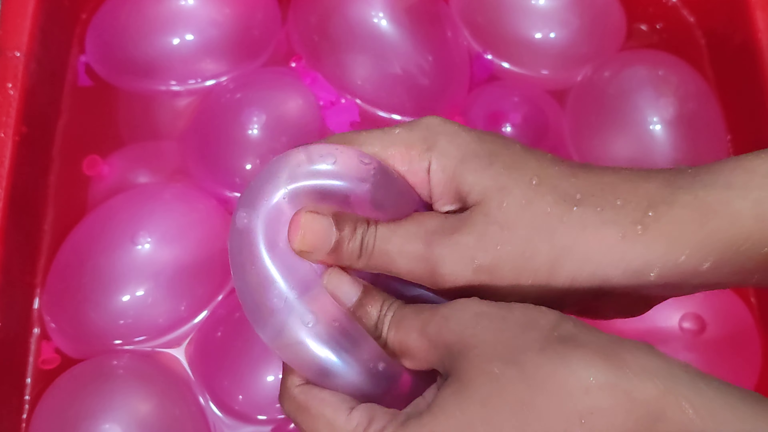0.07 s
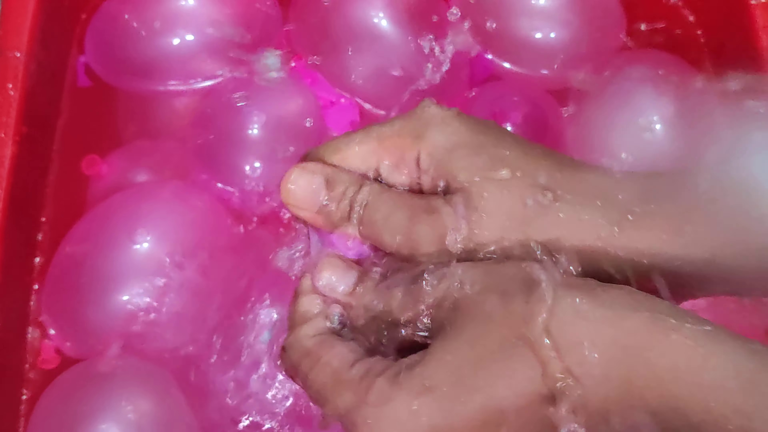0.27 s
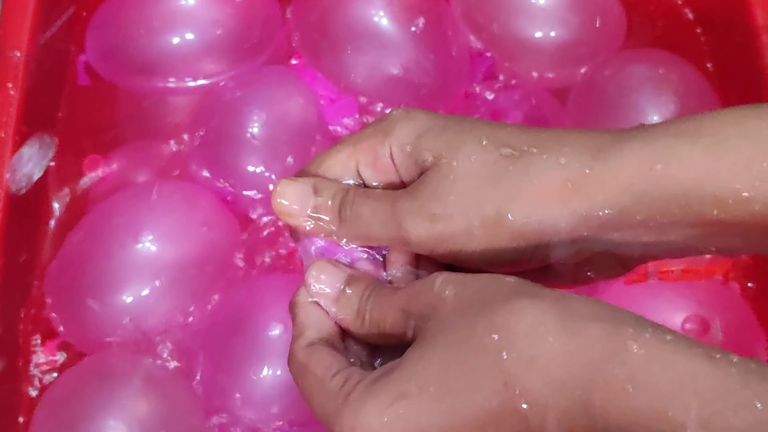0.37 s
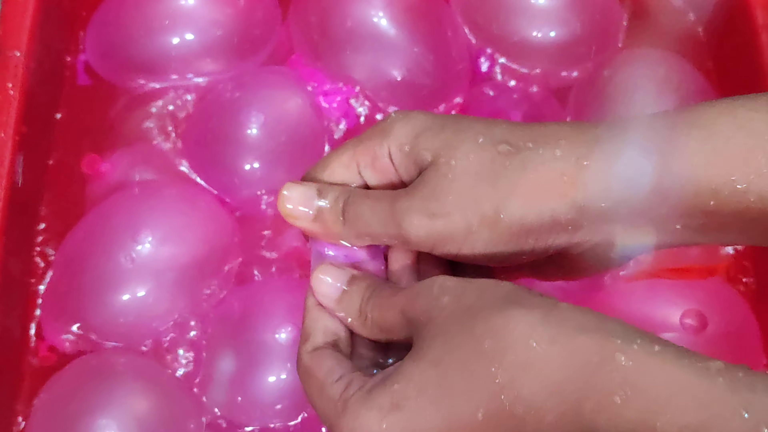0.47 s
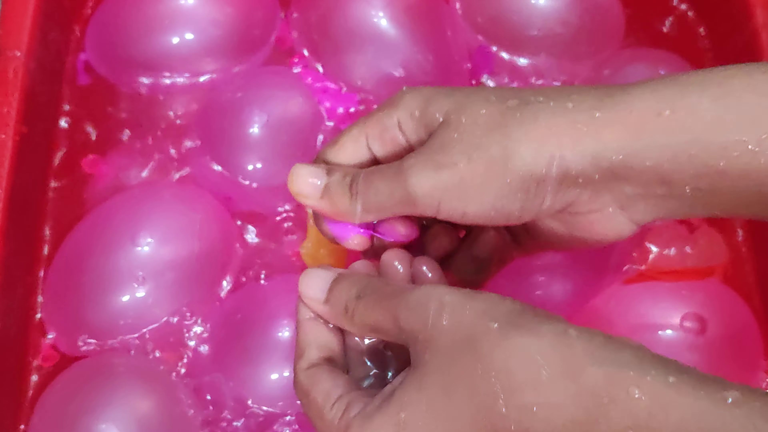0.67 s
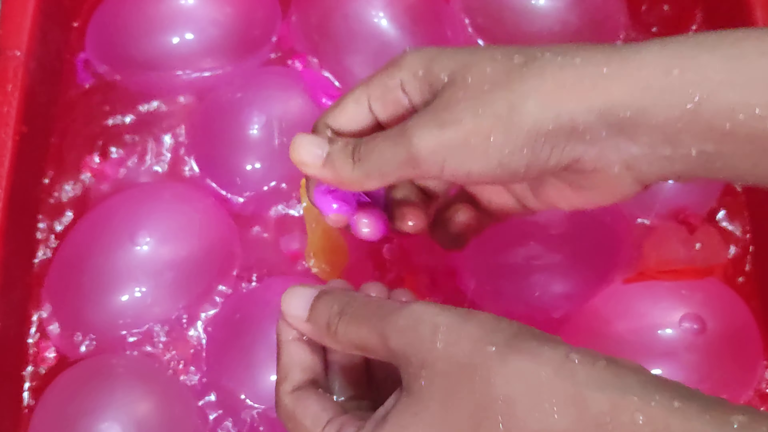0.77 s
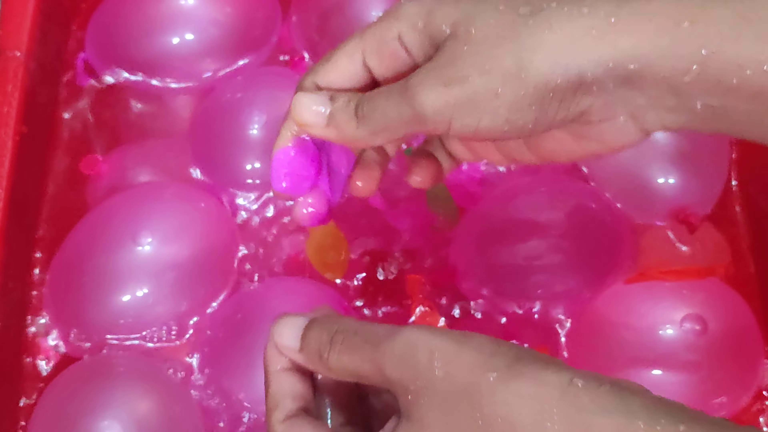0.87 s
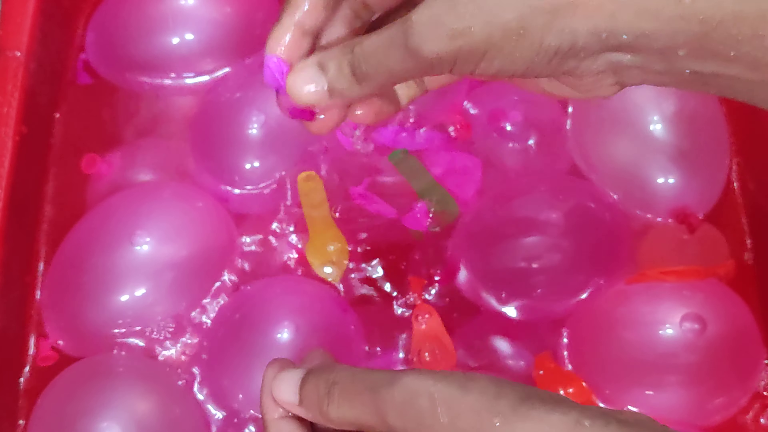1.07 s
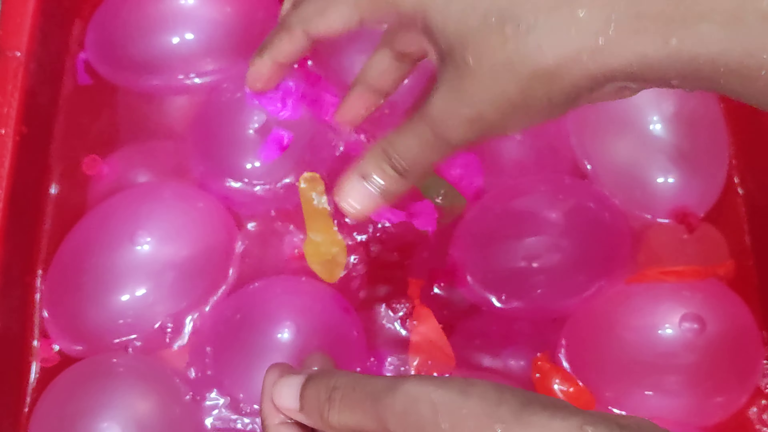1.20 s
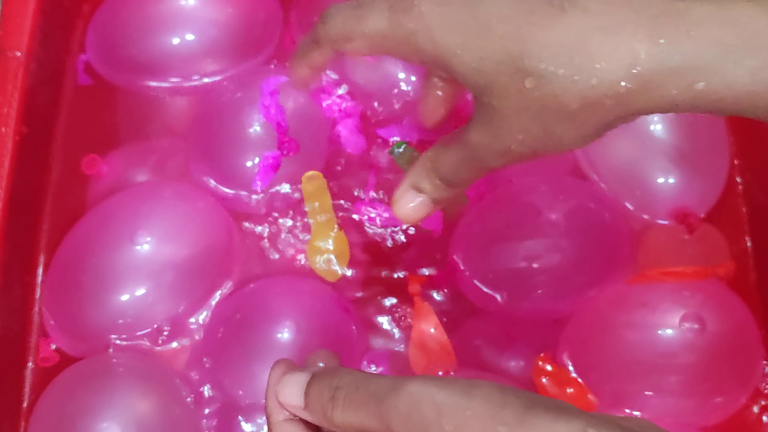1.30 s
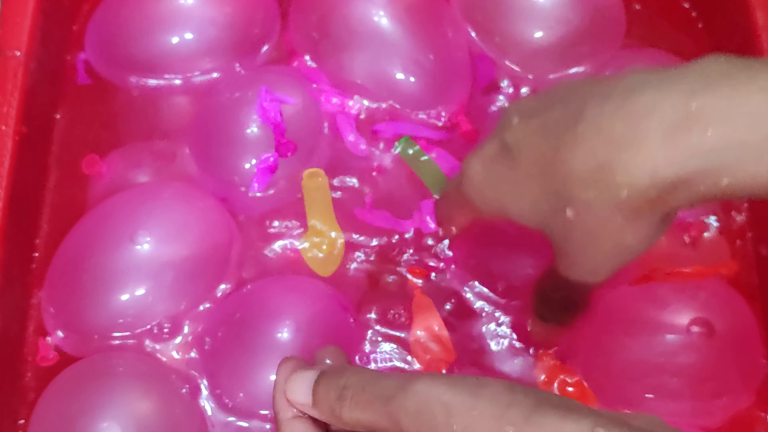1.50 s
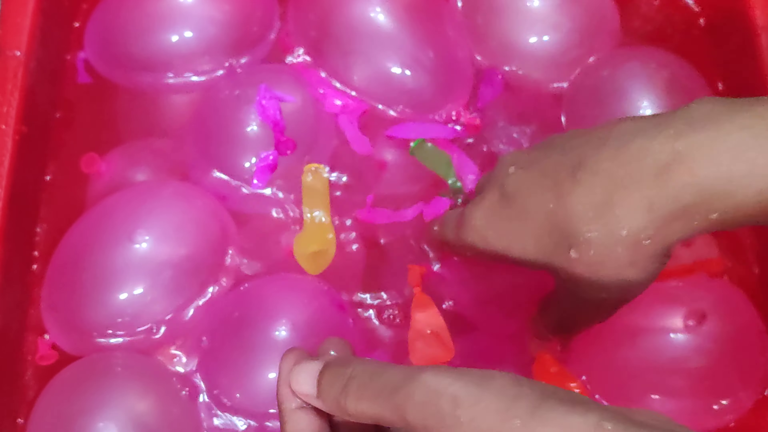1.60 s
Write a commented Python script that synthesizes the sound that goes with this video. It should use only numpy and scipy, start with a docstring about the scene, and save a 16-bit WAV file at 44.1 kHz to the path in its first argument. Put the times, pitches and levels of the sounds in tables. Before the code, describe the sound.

A water balloon bursts with a sharp loud pop, then water splashes down and drips away

```python
"""Water balloon bursting over a tub

A water balloon bursts over a plastic tub of water in a small hard room, close to the microphone.
The rubber snaps as cracks of noise with a sine knock, a hiss of mist follows, and puffs thump the microphone.
Bubbles ring as sines that rise in pitch, and drops splat as bursts of coloured noise.
Falling water is a hail of tiny ringing grains; decaying noise tails make the room, over air and a low rumble."""
import sys
import numpy as np
from scipy import signal
from scipy.fft import rfft, irfft
from scipy.io import wavfile

SR = 44100
rng = np.random.default_rng(int(sys.argv[2]) if len(sys.argv) > 2 else 0)


def generate_wav(sig):
    """Save sig (samples, or channels by samples) to the path in sys.argv[1] as 16-bit PCM at SR."""
    pcm = np.round(np.clip(np.atleast_2d(sig).T, -1, 1) * 32767).astype(np.int16)
    wavfile.write(sys.argv[1], SR, pcm)


N = 72765
T = np.arange(N) / SR  # seconds
HZ = np.fft.rfftfreq(N, 1 / SR)


def amp(db):
    """Decibels to gain."""
    return 10 ** (np.asarray(db) / 20)


def unit(x):
    """Scales to rms 1."""
    return x / np.sqrt(np.mean(x ** 2) + 1e-20)


def read(points, hz):
    """Reads a frequency table on a log-frequency axis."""
    f, value = np.transpose(points)
    return np.interp(np.log(hz + 1), np.log(f + 1), value)


def hump(hz, octaves):
    """A bell-shaped spectrum in dB, 4.3 dB down at the given octaves from its centre."""
    distance = np.log2((HZ + 1) / hz) / octaves
    return np.maximum(-10 * np.log10(np.e) * distance ** 2, -70)


def colour(x, db):
    """Minimum-phase filter with the given spectrum; keeps the power of white noise."""
    log_gain = np.log(unit(amp(db)))
    both_sides = np.r_[log_gain, log_gain[1:N - len(HZ) + 1][::-1]]
    # the Hilbert transform of the log gain gives the phase that makes the filter causal
    response = np.exp(np.conj(signal.hilbert(both_sides)))
    taps = np.fft.ifft(response).real[:4096]
    return signal.fftconvolve(x, taps[None], axes=1)[:, :N]


def pan(db):
    """Left and right gains for a left-over-right level difference."""
    return amp(np.array([[db], [-db]]) / 2)


def swell(age, rise_s, decay_s):
    """An envelope that rises and dies away exponentially."""
    return (1 - np.exp(-age / rise_s)) * np.exp(-age / decay_s)


def burst(s, decay_s, rise_s):
    """A puff of noise that swells and dies away, partly alike in both channels."""
    noise = rng.standard_normal((3, N))
    age = np.maximum(T - s, 0)
    return unit(noise[:2] + 0.4 * noise[2]) * swell(age, rise_s, decay_s)


def room(x, wet_db):
    """The dense ring of hard walls as a noise tail, each band dying at its own speed."""
    # Decay of the room. Each row: frequency in Hz, time to fall by 60 dB in seconds.
    decay_times = [(100, 0.6), (300, 0.16), (900, 0.3), (2000, 0.31), (5500, 0.31), (10000, 0.23),
                   (15000, 0.28)]
    gap_s, build_s = 0.00067, 0.002
    t = T[:SR * 3 // 4]
    density = np.minimum(.08 + t / .08, 1)  # sparse echoes fill in to a dense tail
    echoes = rng.standard_normal((2, len(t))) * (rng.random((2, len(t))) < density)
    echoes *= np.clip((t - gap_s) / build_s, 0, 1)
    hz, at, bands = signal.stft(echoes, SR, nperseg=256)
    fade = amp(-60 * at / read(decay_times, hz)[:, None])
    tail = signal.istft(bands * fade, SR, nperseg=256)[1]
    tail /= np.linalg.norm(tail, axis=1, keepdims=True)
    return amp(wet_db) * signal.fftconvolve(x, tail, axes=1)[:, :N]


def pop():
    """The rubber rips in a few quick cracks, the skin collapses with a knock and the room answers the cracks."""
    # The rubber rips and whips back. Each row: start in seconds, level in dB relative to pop_db.
    rips = [(.2189, -0.5), (.2197, 0), (0.2215, -0.5), (0.2271, -6.5), (0.2332, -7.5), (0.236, -23)]
    # Tone of the cracks. Each row: frequency in Hz, relative level in dB.
    snap_spectrum = [(100, -6), (400, -6.5), (600, -3.5), (1000, 1.5), (1700, 2.5), (2200, 0), (4300, 0),
                     (5500, 0), (7500, 0.5), (9000, -0.5), (10800, 0.5), (12000, 7.5), (15500, 3.5)]
    # Hollow knock of the collapsing skin. Each row: pitch in Hz, level in dB before panning, decay in seconds.
    knock_modes = [(270, -37, 0.0017), (387, -20.5, 0.0018), (744, -27.5, 0.0027), (1110, -26, 0.002),
                   (1570, -27.5, .003), (2200, -19.5, 0.001)]
    pop_db, crack_decay_s, crack_rise_s = -10.5, 0.00078, 0.00005
    knock_s = .2193
    bursts = sum(amp(pop_db + db) * burst(s, crack_decay_s, crack_rise_s) for s, db in rips)
    cracks = colour(bursts, read(snap_spectrum, HZ))
    age = np.maximum(T - knock_s, 0)
    knock = sum(amp(db) * np.exp(-age / decay) * np.sin(2 * np.pi * hz * age)
                for hz, db, decay in knock_modes)
    return (cracks + room(cracks, wet_db=0)) * pan(db=3) + knock * pan(db=8)


def spray():
    """The skin of the water tears into a short hiss of mist."""
    # Tone of the mist. Each row: frequency in Hz, relative level in dB.
    mist_spectrum = [(300, -28.5), (1700, -3.5), (4500, -17), (7400, -8), (9000, -16), (10500, -14),
                     (12000, 0), (15500, -2)]
    hiss = colour(burst(s=.222, decay_s=0.019, rise_s=.004), read(mist_spectrum, HZ))
    return amp(-16.5) * hiss * pan(db=-1.5)


def puffs():
    """Steps of pressure from air and water shove the microphone ports, heard as thumps."""
    # Shoves. Each row: start in seconds, left and right pressure (full scale is 1, before the envelope
    # and leak), rise in seconds, release in seconds.
    shoves = [(0.2209, 0.18, -0.012, 0.000045, 0.038), (0.2194, -0.9, -0.16, 0.0017, 0.026),
              (0.3263, 0.22, 0.0073, 0.0017, 0.28), (.349, 0.089, 0.095, 0.0022, 0.13)]
    leak_hz = 2.17  # the pressure leaks away below this
    steps = np.zeros((2, N))
    for s, left, right, rise, release in shoves:
        age = np.maximum(T - s, 0)
        steps += np.array([[left], [right]]) * swell(age, rise, release)
    return signal.sosfilt(signal.butter(1, leak_hz, "high", fs=SR, output="sos"), steps)


def bubbles():
    """Each bubble rings briefly as a sine and rises in pitch as it nears the surface."""
    # Bubbles trapped in the tub. Each row: start in seconds, starting pitch in Hz, level in dB before
    # the envelope, decay in seconds, pitch rise per decay time as a fraction.
    trapped = [(0.3709, 1011, -25.5, 0.0056, 0.037), (.371, 1920, -23, 0.0025, 0.031),
               (0.371, 2560, -32, 0.0048, 0.073), (.392, 1050, -32, 0.011, .005),
               (.42, 1038, -31, 0.011, 0.0058), (.436, 3670, -31.5, 0.0019, 0.0069),
               (0.4804, 1420, -28, 0.0051, 0.019), (.484, 930, -42, 0.014, .001),
               (.49, 1055, -40, 0.0084, 0.0056), (.487, 2505, -34.5, 0.0029, .03),
               (0.491, 1760, -28.5, 0.0017, .04), (0.516, 1567, -34.5, 0.0042, 0.033),
               (.535, 1209, -40, 0.0052, 0.027), (.578, 1660, -40, 0.004, 0.041),
               (.77, 2100, -42.5, 0.0019, 0.025), (0.817, 5230, -28, 0.0016, 0.018),
               (0.833, 5100, -29, 0.0011, 0.038), (.85, 760, -53.5, 0.012, 0.012),
               (0.907, 4130, -27.5, 0.00097, 0.036), (.908, 710, -40, 0.003, .05),
               (.909, 1216, -45, 0.0029, .03), (.912, 485, -45.5, 0.0038, .04),
               (1.233, 3770, -34.5, 0.0014, 0.036), (1.24, 3100, -51.5, 0.0035, .01),
               (1.25, 3630, -40.5, 0.0018, 0.04), (1.267, 3800, -52, .0015, .02),
               (1.289, 3600, -55, .002, 0.018), (1.606, 2380, -53, 0.0015, 0.016)]
    rise_s, room_db = 0.00081, 0.5
    rings = []
    for s, hz, db, decay, pitch_rise in trapped:
        age = np.maximum(T - s, 0)
        pitch = hz * (1 + pitch_rise * np.minimum(age / decay, 10))
        turns = np.cumsum(pitch * (age > 0)) / SR
        rings.append(amp(db) * swell(age, rise_s, decay) * np.sin(2 * np.pi * turns))
    # three groups, each with its own room tail
    wet = sum(room(sum(rings[k::3]) * pan(0), room_db) for k in range(3))
    return sum(rings) + wet


def drops():
    """Single splats of noise, each with its own colour and its own share of the room."""
    # Drops and gobs of water landing. Each row: start in seconds, level in dB before envelope and panning,
    # centre in Hz, width in octaves, decay in seconds, left-over-right level in dB, room send in dB.
    landings = [(0.3255, -38.5, 3900, 2.46, 0.029, 15.5, 4), (0.358, -26, 490, 1.46, 0.0024, 9.5, -10.5),
                (0.37, -30.5, 3300, 1.56, 0.0095, -4.5, 2.5), (0.456, -36, 6510, 1.5, 0.0041, 2, 5),
                (0.481, -34, 2120, 1.43, 0.0054, -6, 2), (0.494, -31, 6160, 0.25, 0.0022, 4, -2.5),
                (0.564, -31, 5250, 0.36, 0.0036, -1.5, 2.5), (0.575, -38, 5900, 0.21, 0.0014, 3, 5.5),
                (.617, -30.5, 8100, 0.55, 0.0027, 0, 2), (0.7292, -29.5, 11000, 1.36, 0.0025, -3, 4),
                (0.739, -31.5, 9900, 1.36, 0.004, 1, 2), (0.763, -32, 9500, 1.06, 0.0045, 1, -3),
                (.8182, -29.5, 6470, 0.55, 0.0018, -2, 5), (0.849, -37, 10500, 0.28, 0.0027, 5, -6),
                (0.9054, -32.5, 3180, 2.1, 0.0027, 3.5, -4.5), (0.9208, -31.5, 9200, 1.9, .003, -7, -1),
                (.966, -53, 9000, 0.83, 0.0025, 5, -5), (0.9728, -38, 13200, 0.42, 0.0034, 2, -1),
                (1.0393, -34.5, 11100, .9, 0.0007, 1, -5), (1.1696, -49.5, 9160, 1.2, 0.0022, 1, 0),
                (1.2308, -38, 9500, 1.6, 0.0013, 0.5, 3), (1.309, -42.5, 13500, 0.35, 0.0034, -1, -3.5),
                (1.6045, -55.5, 1570, 0.53, 0.011, 2, 3)]
    rise_share = 0.21  # rise time as a share of the decay time
    splats, sends = [], []
    for s, db, hz, width, decay, side, room_db in landings:
        noise = burst(s, decay, rise_share * decay)
        splat = amp(db) * pan(side) * colour(noise, hump(hz, width))
        splats.append(splat)
        sends.append(amp(room_db) * splat)
    # three groups, each with its own room tail
    return sum(splats) + sum(room(sum(sends[k::3]), 0) for k in range(3))


def shower(spectrum, per_s, level_db, low_hz, high_hz, count=24):
    """A hail of ringing droplets, random in size and place; per_s counts those of all pitches together."""
    decay_cycles, pitch_rise = 2.8, 0.065  # the rise is a fraction per decay time
    size_db, spread = 3, 0.63  # the spread sets the random left and right parts
    out = np.zeros((2, N))
    for hz in np.geomspace(low_hz, high_hz, count):
        turns = hz * T[:1500]
        bend = 1 + pitch_rise * np.minimum(turns / decay_cycles, 2) / 2
        grain = np.exp(-turns / decay_cycles) * np.sin(2 * np.pi * turns * bend)
        size = amp(size_db * np.minimum(rng.exponential(1, N), 4))
        hits = size * (rng.random(N) < per_s / count / SR)
        shared_sign = rng.choice([-1, 1], N)
        train = hits * (shared_sign + spread * rng.uniform(-2.58, 3.2, (2, N)))
        out += signal.oaconvolve(train, np.sqrt(hz) * unit(grain)[None], axes=1)[:, :N]
    out = unit(colour(out, read(spectrum, HZ))) * amp(level_db) / 2
    return out + room(out, wet_db=2)


def falling_water():
    """The mass of water splashes down, then thins to a spatter."""
    # Fall of the water. Each row: time in seconds, level of the low splash in dB, level of the fine
    # spatter in dB, both before the halving in shower, the room and the panning.
    flow = [(.22, -86, -98), (.25, -55, -55), (0.309, -45.5, -42), (0.378, -33.5, -37), (0.449, -49.5, -48),
            (.53, -47, -51), (0.622, -50, -52), (0.701, -56.5, -46.5), (0.781, -55, -43.5),
            (.88, -54.5, -50.5), (0.939, -55.5, -40.5), (1.029, -69.5, -63.5), (1.2, -68.5, -65),
            (1.3, -73, -60.5), (1.451, -73, -69), (1.65, -82, -70.5)]
    # Tone of the low splash. Each row: frequency in Hz, relative level in dB.
    splash_spectrum = [(100, -8.5), (350, -2), (600, -3.5), (1000, -3.5), (2000, -1.5), (3500, -3.5),
                       (7000, -13), (16000, -9)]
    # Tone of the fine spatter. Each row: frequency in Hz, relative level in dB.
    spatter_spectrum = [(300, 2), (2000, -24), (4000, -1), (6000, 1), (7500, -0.5), (9000, -6),
                        (12000, 5.5), (15000, 2.5), (16000, -9)]
    s, splash_db, spatter_db = np.transpose(flow)
    splash = shower(splash_spectrum, 1100, np.interp(T, s, splash_db), low_hz=298.5, high_hz=6970)
    spatter = shower(spatter_spectrum, 2600, np.interp(T, s, spatter_db), low_hz=2070, high_hz=16100)
    return splash * pan(db=1.5) + spatter * pan(db=-2.6)


def background():
    """Quiet room air as shaped noise, with a low rumble of narrow noise that swells and fades."""
    # Tone of the room air. Each row: frequency in Hz, relative level in dB.
    air_spectrum = [(20, 6.5), (53, -17.5), (104, -6), (190, -14.5), (300, -14), (560, -20), (850, -21.5),
                    (1500, -29.5), (2500, -32.5), (8000, -45.5), (16000, -40.5)]
    # Swell of the rumble. Each row: time in seconds, level in dB.
    rumble_levels = [(0, -62.5), (.78, -70), (.92, -58), (1.12, -61), (1.4, -76), (1.65, -67.5)]
    air_db = -55.5
    noise = rng.standard_normal((4, N))
    same = np.interp(HZ, [100, 900], [.85, .3])  # share of power alike in both channels
    mixed = rfft(noise[:2]) * np.sqrt(abs(1 - same)) + rfft(noise[2]) * np.sqrt(same)
    air = irfft(mixed * amp(read(air_spectrum, HZ)), N)
    rumble = irfft(rfft(noise[3]) * amp(hump(hz=102.8, octaves=0.35)), N)
    rumble_gain = amp(np.interp(T, *np.transpose(rumble_levels)))
    return amp(air_db) * unit(air) + rumble_gain * unit(rumble)


def scene():
    """Everything at the microphone."""
    return pop() + spray() + puffs() + bubbles() + drops() + falling_water() + background()


def record(dry):
    """The recorder's band limit: a steep low-pass filter."""
    edge_hz = 16050
    taps = signal.firwin(511, edge_hz, window=("kaiser", 9), fs=SR)
    return signal.oaconvolve(dry, taps[None], "same")


dry = scene()
out = record(dry)
generate_wav(out)
```